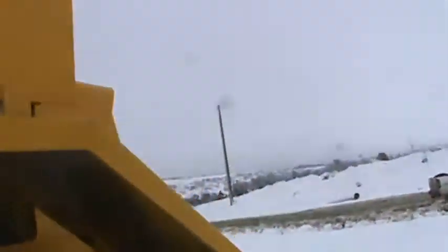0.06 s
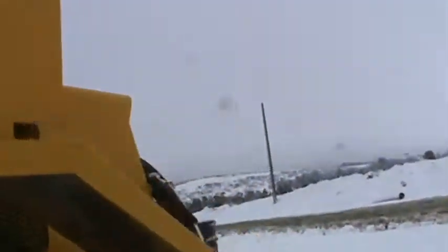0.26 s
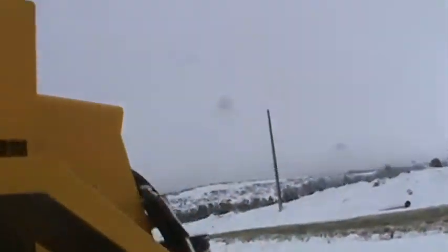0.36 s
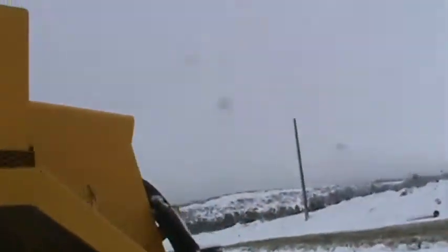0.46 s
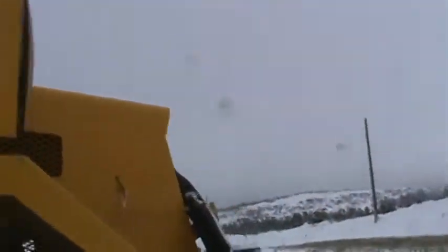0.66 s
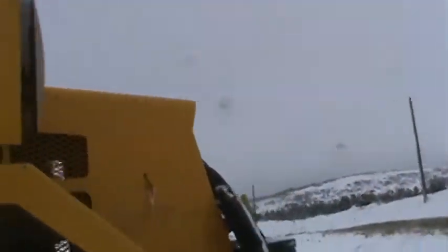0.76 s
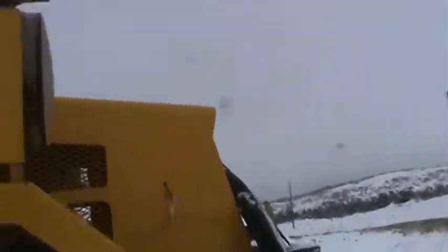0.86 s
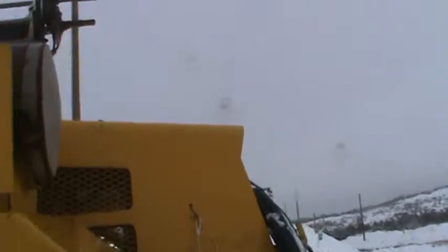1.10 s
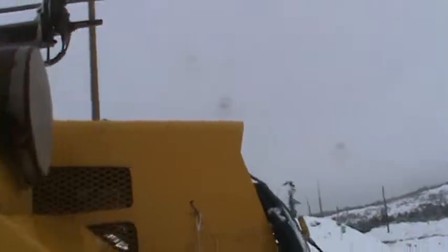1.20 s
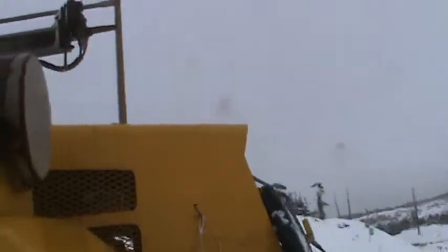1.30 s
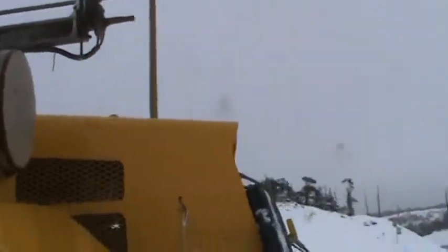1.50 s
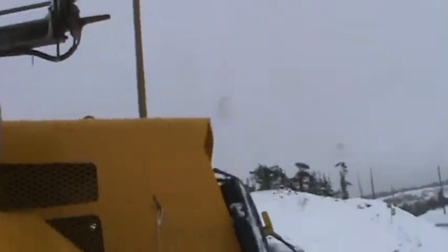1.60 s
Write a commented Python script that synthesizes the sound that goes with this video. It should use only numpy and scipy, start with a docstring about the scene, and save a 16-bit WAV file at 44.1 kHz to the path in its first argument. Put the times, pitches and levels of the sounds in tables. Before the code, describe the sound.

Wind buffets the microphone of a hand-held camera on open, snowy ground, rumbling unevenly with low thumps and a few pops. After the strongest gust it drops, and the plastic case ticks faintly over a thin, distant hiss.

```python
"""Gusty wind rumbles right on the microphone: a hand-held camera's two ports, on open, snowy ground.
Eddies thump the ports and the sharpest ones pop. Far behind lies a thin hiss of open air,
ducked with everything else by the limiter. Close up, the hand rustles and squeaks faintly on the
camera's plastic case, which creaks and ticks as the wind drops."""
import sys
import numpy as np
from scipy import signal
from scipy.fft import rfft, irfft
from scipy.io import wavfile
from scipy.ndimage import uniform_filter1d

SR = 44100
rng = np.random.default_rng(int(sys.argv[2]) if len(sys.argv) > 2 else 0)


def store_wav(level_fs):
    """Save 16-bit WAV to argv[1]."""
    pcm = np.round(np.clip(np.atleast_2d(level_fs), -1, 1) * 32767)
    wavfile.write(sys.argv[1], SR, pcm.T.astype(np.int16))


N = 72765
T = np.arange(N) / SR

# Distant air: spectrum (f/Hz, density/dB), left-right likeness (f/Hz, 0-1), course (t/s, level/dB)
AIR_SPECTRUM = [(400, 3.5), (750, 3.5), (1400, -1), (3100, -7.5), (4000, -10.5), (5500, -12.5), (8200, -15),
                (11000, -19), (16000, -25.5)]
AIR_LIKENESS = [(100, 0.16), (600, 1), (1400, 0.27), (3100, 0.8), (7000, 0.8), (15000, 0.29)]
AIR_LEVEL = [(0, -45.5), (.18, -47), (.29, -45), (.55, -43.5), (.75, -43.5), (1.1, -42), (1.27, -47.5),
             (1.42, -46), (1.47, -41.5), (1.55, -45)]
# Brief swells of bright hiss: hand rustle on the case, and the air brightening faintly near 0.93 s
# (t/s, length/s, level/dB), and their spectrum (f/Hz, density/dB)
BRIGHT_SWELLS = [(0.007, 0.12, -48), (0.16, 0.12, -52), (0.93, 0.17, -64), (1.341, 0.038, -47.5),
                 (1.506, 0.071, -54)]
SWELL_SPECTRUM = [(1500, 4), (4700, 4), (8500, 0.5), (15000, -9.5)]
# Squeaks of the grip (t/s, level/dB, f/Hz)
GRIP_SQUEAKS = [(0.151, -49.5, 4550), (.291, -49.5, 4180)]
# Ticks of the case (t/s, level/dB, treble tilt/dB per octave)
CASE_TICKS = [(0.753, -38, 6), (1.303, -30, -1.5), (1.3660, -28, -2.5), (1.398, -26, -2),
              (1.445, -26.5, -1.5), (1.449, -29, -1.2), (1.4628, -35, 9), (1.472, -22, -2.5),
              (1.5069, -34.5, 0), (1.515, -25, -2), (1.5639, -29.5, -2), (1.569, -24.5, -2),
              (1.603, -28, -3.5)]
# A tick's crack (f/Hz, density/dB) and the modes it rings (f/Hz, level/dB, t60/s)
CRACK_SPECTRUM = [(200, 10), (900, -11), (3200, 3.5), (7000, -2), (11000, -11), (16000, -21)]
CASE_MODES = [(700, -11.5, 0.015), (1015, -12.5, 0.018), (2100, -20, 0.0058), (3160, -12, 0.013)]
# Sharpest eddies, overloading one port against the other (t/s, level/dB, width/s)
EDDY_POPS = [(.2231, -3, .00027), (.2348, 0, .00034), (.2836, -6, .0007), (.3877, -9.5, .0007),
             (.7628, -8.5, .00032), (.7761, -6, .0007), (1.3654, -11, .0004)]
# Compact eddies (t/s, level/dB, f/Hz)
EDDY_THUMPS = [(0.5, -11, 108), (0.555, -11, 123), (0.869, -12.5, 104)]
# Wind between the buffets (t/s, level/dB)
BREEZE_LEVEL = [(0, -38.5), (.165, -45), (.215, -24.5), (.31, -30), (.43, -22.5), (.53, -29.5),
                (.60, -31.5), (.73, -31), (.83, -24), (.94, -21), (1.0, -32), (1.10, -40), (1.135, -10.5),
                (1.29, -18.5), (1.33, -22), (1.38, -24.5), (1.41, -42.5), (1.56, -35)]
# Single eddies striking the ports (t/s, length/s, level/dB, roar drive over rumble drive/dB)
EDDY_BUFFETS = [(0.068, 0.0091, -27, -16), (0.098, 0.0058, -27.5, -10), (0.205, 0.015, -26, -2.5),
                (0.229, 0.013, -8.5, -8), (0.255, 0.023, -14.5, -10.5), (0.282, 0.0079, -8.5, -42),
                (0.334, 0.011, -19, -25), (0.357, 0.021, -20.5, -29), (0.385, 0.0076, -10, -27),
                (0.405, 0.003, -10.5, -31), (0.457, 0.027, -14.5, -10), (0.49, 0.012, -19.5, -5),
                (0.556, 0.0096, -11, -8), (0.633, 0.021, -18, -31), (0.684, 0.0083, -18, -10.5),
                (0.764, 0.0088, -9.5, -1.5), (0.778, 0.0074, -8, -12), (0.812, 0.018, -14, -7),
                (0.918, 0.0068, -10, -11.5), (0.93, 0.012, -12, -2), (0.963, 0.018, -22.5, 0.5),
                (1.033, 0.018, -17, -35), (1.051, 0.016, -17.5, -5), (1.078, 0.028, -20, -23),
                (1.118, 0.0064, -12.5, -31), (1.177, 0.028, -12, -8), (1.214, 0.05, -9.5, -7),
                (1.254, 0.017, -3.5, -14), (1.285, 0.016, -5, -23), (1.3, 0.021, -7.5, -6.5),
                (1.345, 0.017, -19.5, -1), (1.364, 0.0059, -9, -0.5), (1.508, 0.015, -23.5, -4.5)]
# Wind at the ports: common rumble, opposed rumble and the roar above them (f/Hz, density/dB)
COMMON_RUMBLE = [(10, -24), (25, -4.5), (65, 0), (120, -4.5), (190, -8.5), (280, -15.5), (420, -31.5),
                 (800, -44), (2000, -106)]
OPPOSED_RUMBLE = [(10, -24), (30, -11), (80, -4), (160, -1), (240, 0), (330, -8), (480, -14), (900, -27.5),
                  (2500, -79)]
ROAR_SPECTRUM = [(100, -61), (250, 8), (400, 5.5), (550, -6), (800, -11.5), (1200, -21), (2000, -25),
                 (3500, -33.5), (7000, -74)]

SPREAD = .4  # opposed part of the ticks and bright swells, relative to the common part


def amp(db):
    """Decibels to gain."""
    return 10 ** (np.asarray(db) / 20)


def unit(x):
    """Scales to an rms of one."""
    return x / np.sqrt(np.mean(x ** 2) + 1e-20)


def read(points, hz):
    """Reads a spectrum on a log-frequency axis."""
    f, value = np.transpose(points)
    return np.interp(np.log(hz + 1), np.log(f), value)


def curve(points):
    """Gain over time from (t/s, level/dB) points."""
    return amp(np.interp(T, *np.transpose(points)))


def bell(u):
    """Gaussian swell of unit height and area."""
    return np.exp(-np.pi * u ** 2)


def noise(spectrum, tilt_db=0):
    """Noise with the given spectrum, tilted per octave."""
    hz = np.fft.rfftfreq(N, 1 / SR)
    gain = amp(read(spectrum, hz) + tilt_db * np.log2(hz + 1))
    return unit(irfft(rfft(rng.standard_normal(N)) * gain, N))


def ports(common, opposed):
    """Left and right microphone port from a common and an opposed part."""
    return np.array([common + opposed, common - opposed])


def air_hiss(patch_db=2, flicker_db=1.74, left_db=0.7):
    """Far off: thin hiss of the open air, with drifting patches and a slight flicker."""
    frames, hz = N // 128 + 5, np.fft.rfftfreq(512, 1 / SR)
    a, b, c, d, patches = np.moveaxis(rng.standard_normal((frames, len(hz), 5)), 2, 0)
    patches = unit(uniform_filter1d(uniform_filter1d(patches, size=14, axis=0), size=9, axis=1))
    flicker = rng.standard_normal((frames, 1))
    likeness = read(AIR_LIKENESS, hz)
    left = a + 1j * b
    right = likeness * left + np.sqrt(1 - likeness ** 2) * (c + 1j * d)
    gain = amp(read(AIR_SPECTRUM, hz) + patch_db * patches + flicker_db * flicker)
    spectra = np.array([left, right]) * gain
    hiss = signal.istft(spectra.transpose(0, 2, 1), nperseg=512, noverlap=384)[1][:, :N]
    return unit(hiss) * curve(AIR_LEVEL) * amp([[left_db / 2], [-left_db / 2]])


def bright_swells():
    """Brief swells of bright hiss: hand rustle on the case, and once the air brightening faintly."""
    power = sum(amp(db) ** 2 * bell((T - s) / length) for s, length, db in BRIGHT_SWELLS)
    return np.sqrt(power) * ports(noise(SWELL_SPECTRUM), SPREAD * noise(SWELL_SPECTRUM))


def grip_squeaks(length_s=0.014, skirt_db=-60):
    """The grip catches for an instant: a tiny, narrow-band squeak, dead centre."""
    out = np.zeros(N)
    for s, db, hz in GRIP_SQUEAKS:
        band = noise([(hz / 2, skirt_db), (hz, 0), (hz * 2, skirt_db)])
        out += amp(db) * bell((T - s) / length_s) * band
    return out


def grip_slip(t, pitch, tilt_db, crack_t60_s=0.011):
    """One slip is a short crack that rings the plastic case; bright slips ring it less."""
    ring = sum(amp(db - tilt_db - 60 * t / t60) * np.sin(2 * np.pi * (hz * pitch * t + rng.random()))
               for hz, db, t60 in CASE_MODES)
    crack = amp(-60 * t / crack_t60_s) * noise(CRACK_SPECTRUM, tilt_db)[:len(t)]
    return ring + crack


def case_ticks(rise_s=.0002, detune=.03):
    """The case around the microphone ticks at each slip, detuned a little by the grip."""
    out = np.zeros((2, N))
    t = np.arange(0, .06, 1 / SR)
    attack = np.minimum(t / rise_s, 1)
    for s, db, tilt_db in CASE_TICKS:
        pitch = 1 + detune * rng.standard_normal()
        tick = ports(grip_slip(t, pitch, tilt_db), SPREAD * grip_slip(t, pitch, tilt_db))
        slot = out[:, round(s * SR):][:, :len(t)]
        slot += (amp(db) * attack * tick)[:, :slot.shape[1]]
    return out


def eddy_pops(common_db=-18, rebound_widths=2.3):
    """Pressure builds to a narrow spike, drops and rebounds, mostly opposed in the two ports."""
    out = np.zeros((2, N))
    for s, db, width in EDDY_POPS:
        u = (T - s) / width
        spike = (1 + u ** 2) ** -2
        rebound = (1 + (u / rebound_widths) ** 2) ** -2 / rebound_widths
        swing = 2 * u / (1 + u ** 2) * np.exp(-abs(u) / 10)
        out += amp(db) * ports(amp(common_db) * swing, spike - rebound)
    return out


def eddy_thumps(length_cycles=1.53):
    """A compact eddy swings the pressure at both ports for a cycle or two: a round, low thump."""
    out = np.zeros(N)
    for s, db, hz in EDDY_THUMPS:
        cycles = (T - s) * hz
        out += amp(db) * bell(cycles / length_cycles) * np.sin(2 * np.pi * (cycles + rng.random()))
    return out


def turbulence(spectrum, eddy_s=0.048):
    """Coloured noise whose strength stays fairly even from one eddy to the next."""
    flow = noise(spectrum)
    window = signal.windows.hann(int(eddy_s * SR) + 3)
    power = signal.fftconvolve(abs(signal.hilbert(flow)) ** 2, window, "same")
    return unit(flow / np.sqrt(abs(power) + 1e-9))


def gusts(breeze_roar_db=-16.5, rise_to_fall=0.73):
    """Power driving the rumble and the roar: the breeze plus buffets that rise faster than they fall."""
    rumble_power = curve(BREEZE_LEVEL) ** 2
    roar_power = rumble_power * amp(breeze_roar_db) ** 2
    for s, length, db, roar_db in EDDY_BUFFETS:
        u = (T - s) / length
        swell = bell(np.where(u < 0, u / rise_to_fall, u))
        rumble_power += swell * amp(db) ** 2
        roar_power += swell * amp(db + roar_db) ** 2
    return rumble_power, roar_power


def wind(grit=0.42, deep_hz=103, deep_ceiling_db=-11.5):
    """Right on the microphone, gusts drive a rumble and a rougher roar above it."""
    rumble_power, roar_power = gusts()
    common = turbulence(COMMON_RUMBLE)
    crests = unit(1 + grit * (common ** 2 - 1))  # the roar breaks out on the pressure crests
    deep = signal.sosfiltfilt(signal.butter(2, deep_hz, fs=SR, output="sos"), common)
    # The deepest part stops growing in strong gusts.
    held_deep = deep / np.sqrt(1 + rumble_power / amp(deep_ceiling_db) ** 2)
    rumble = ports(common - deep + held_deep, amp(-4) * turbulence(OPPOSED_RUMBLE))
    roar = ports(amp(-8) * turbulence(ROAR_SPECTRUM), amp(-3.5) * turbulence(ROAR_SPECTRUM))
    return rumble * np.sqrt(rumble_power) + roar * crests * np.sqrt(roar_power)


def scene():
    """Wind on the ports, the open air behind it and the hand on the case."""
    buffeting = wind() + eddy_thumps() + eddy_pops()
    return buffeting + air_hiss() + case_ticks() + bright_swells() + grip_squeaks()


def record(dry):
    """In the camera, a limiter ducks hard pushes on both ports; peaks round off; the top treble is cut."""
    limit_db, recover_db_per_s, duck_share = -6.5, 80, 0.65
    ceiling, knee, edge_hz = .99, 6, 15800
    recovery_db = T * recover_db_per_s
    common_db = 20 * np.log10(abs(dry.mean(0)) + 1e-9)
    held_db = np.maximum.accumulate(common_db + recovery_db) - recovery_db
    over_db = np.maximum(held_db - limit_db, 0)
    duck_db = duck_share * uniform_filter1d(uniform_filter1d(over_db, size=120), size=120)
    ducked = dry / amp(duck_db)
    rounded = ducked / (1 + abs(ducked / ceiling) ** knee) ** (1 / knee)
    lowpass = signal.firwin(511, edge_hz, window=("kaiser", 9), fs=SR)
    return signal.oaconvolve(rounded, lowpass[None], "same")


dry = scene()
out = record(dry)
store_wav(out)
```